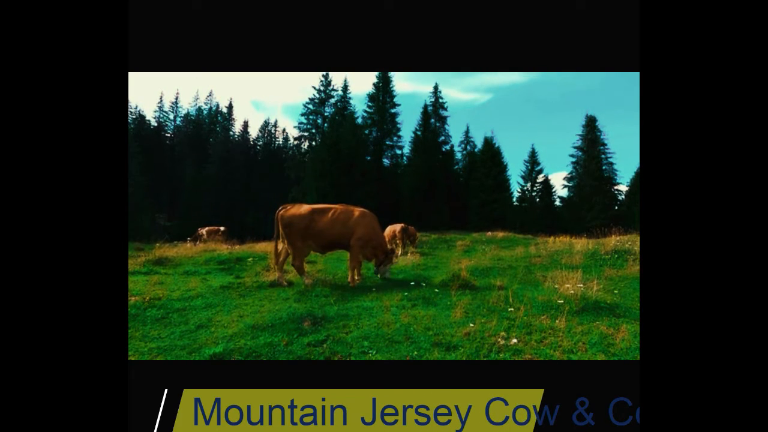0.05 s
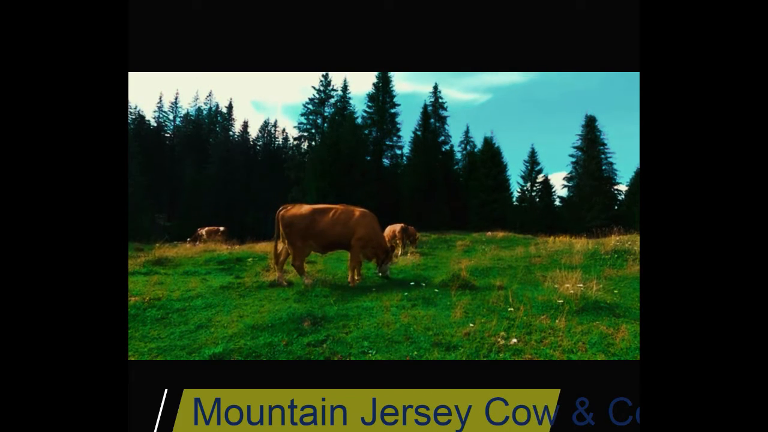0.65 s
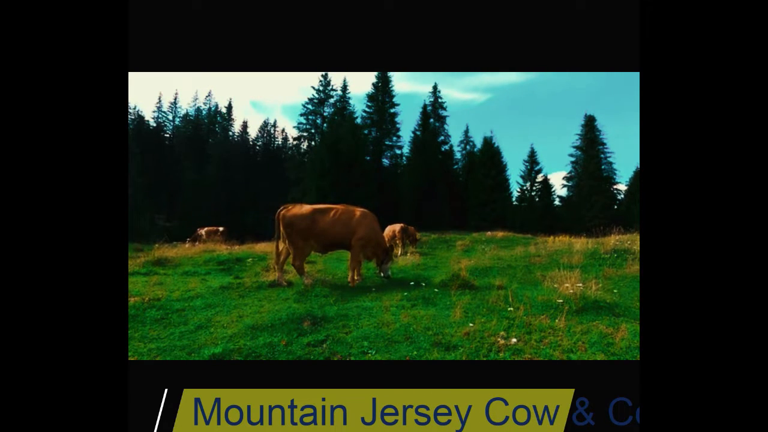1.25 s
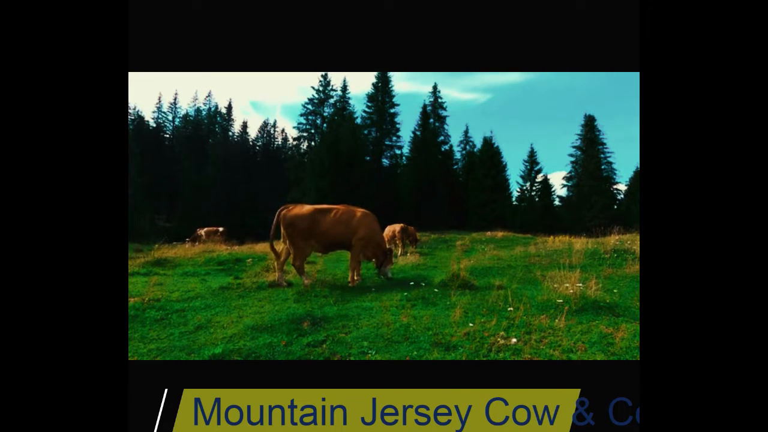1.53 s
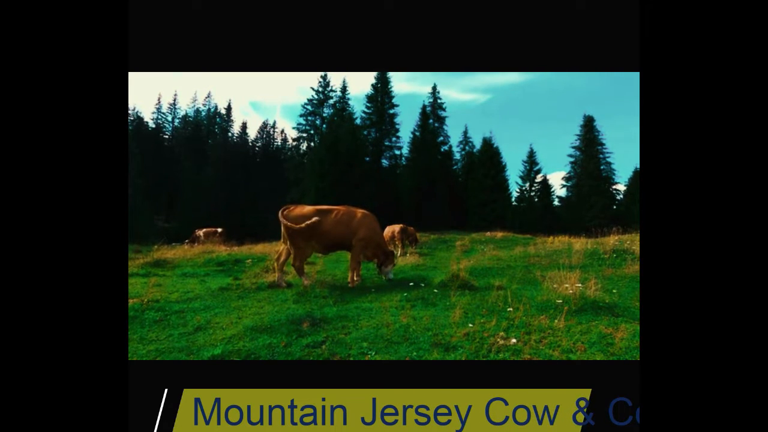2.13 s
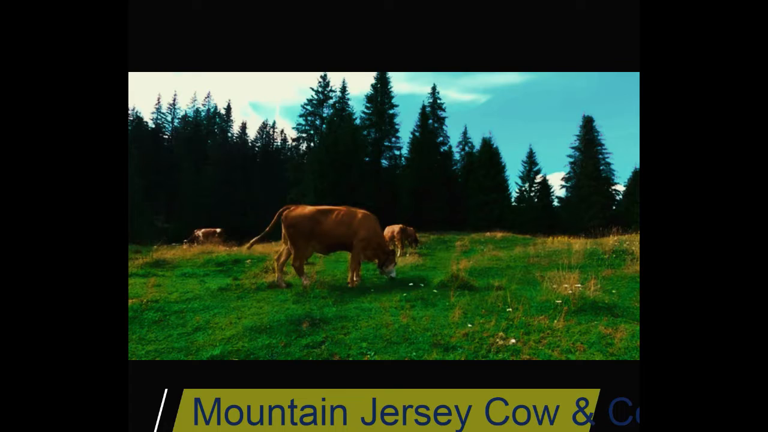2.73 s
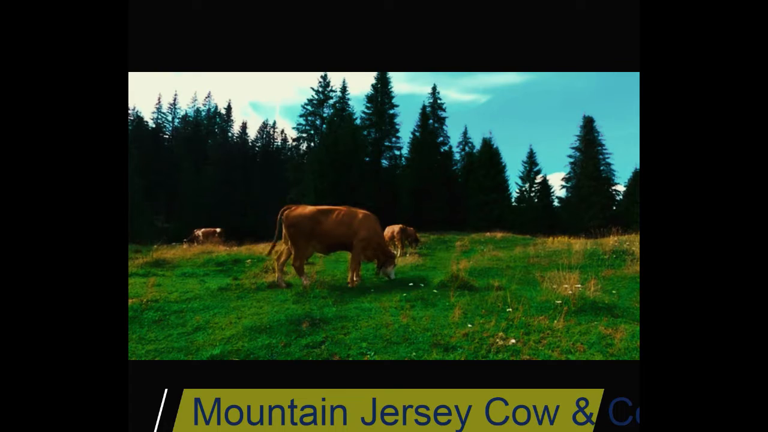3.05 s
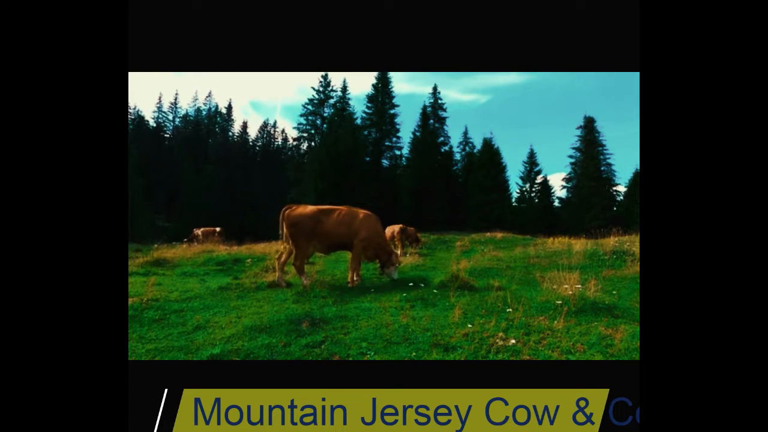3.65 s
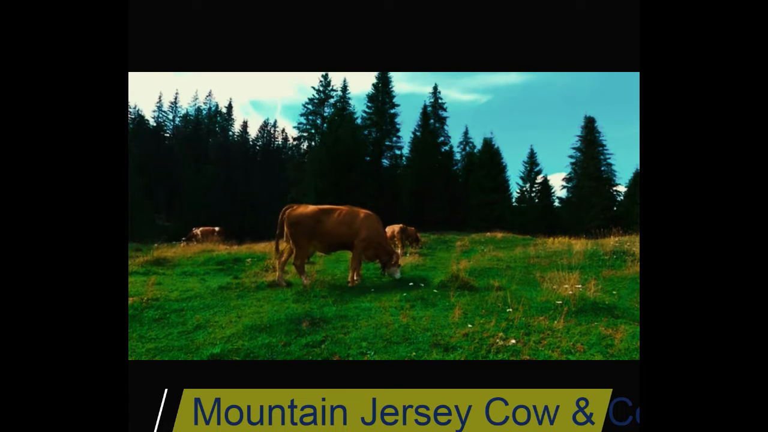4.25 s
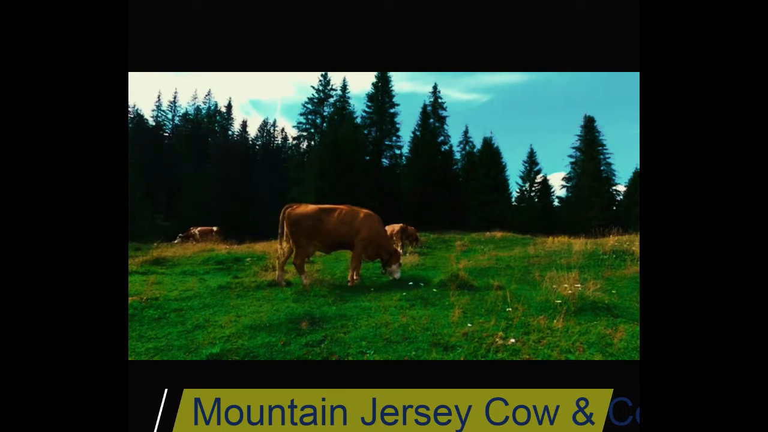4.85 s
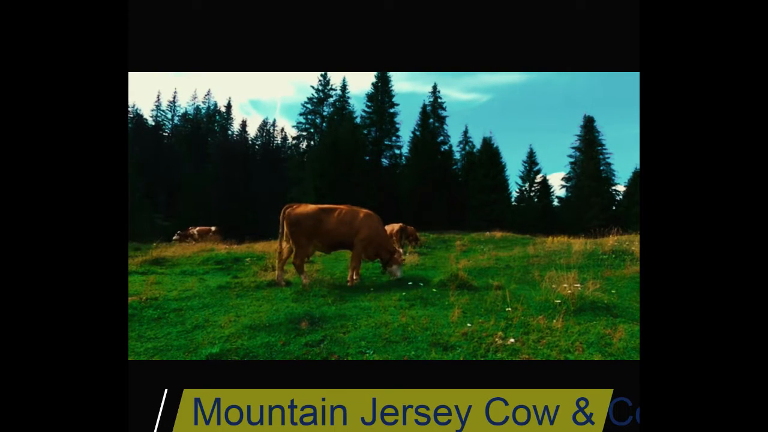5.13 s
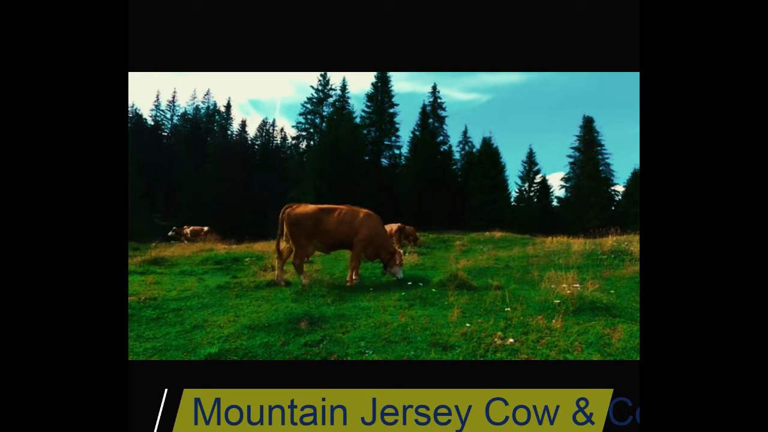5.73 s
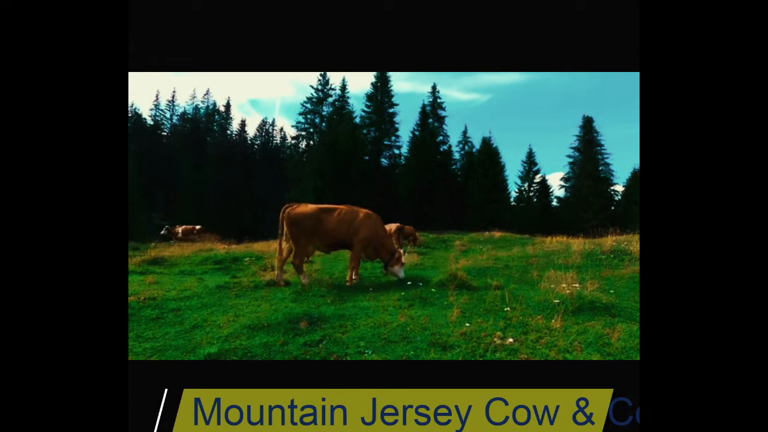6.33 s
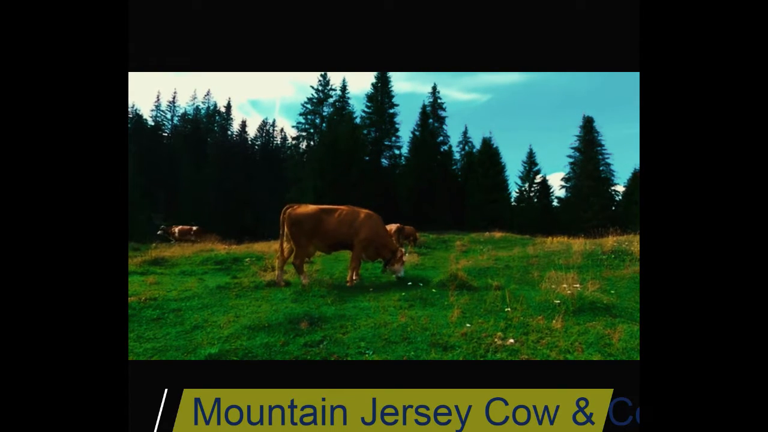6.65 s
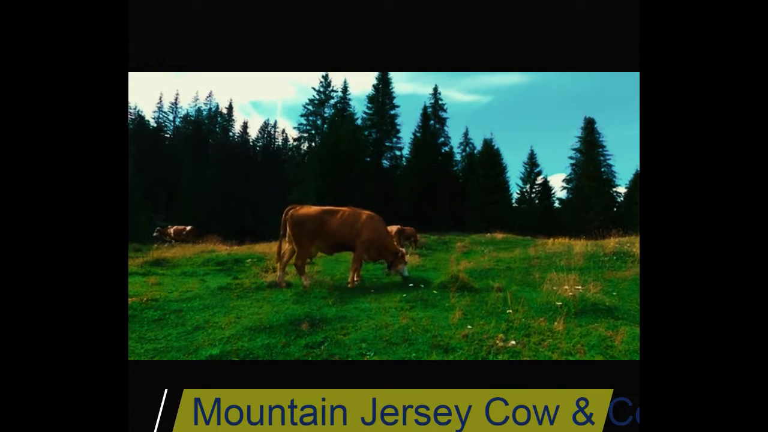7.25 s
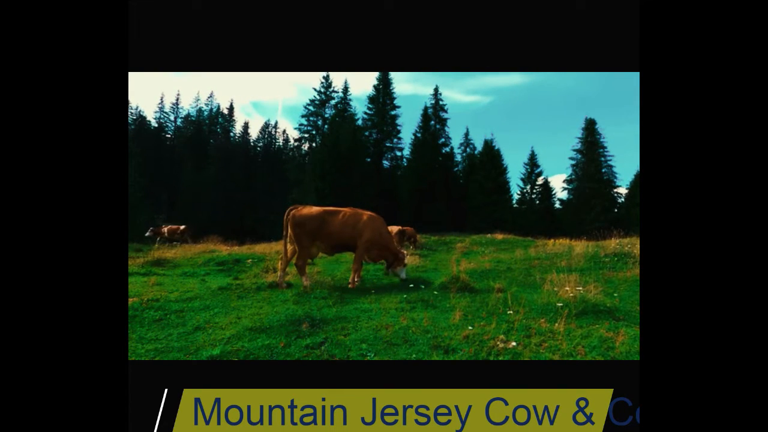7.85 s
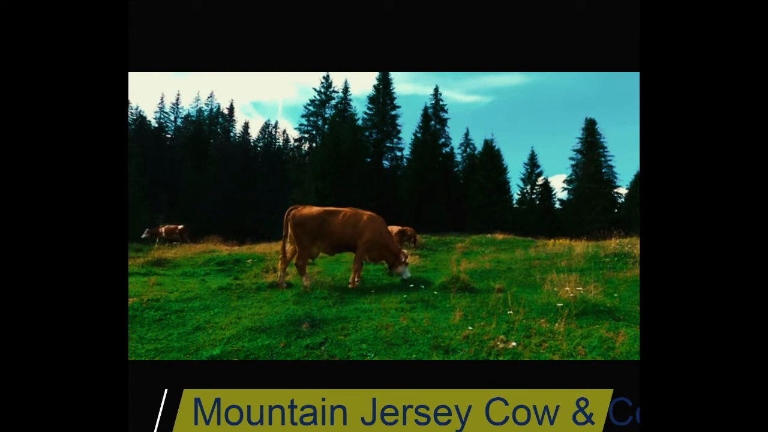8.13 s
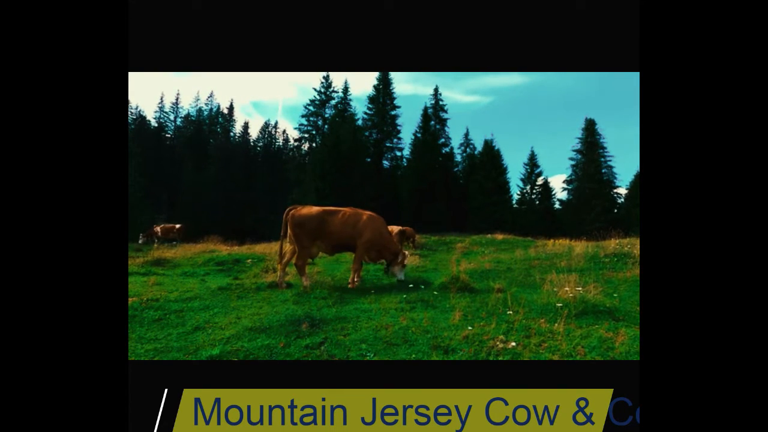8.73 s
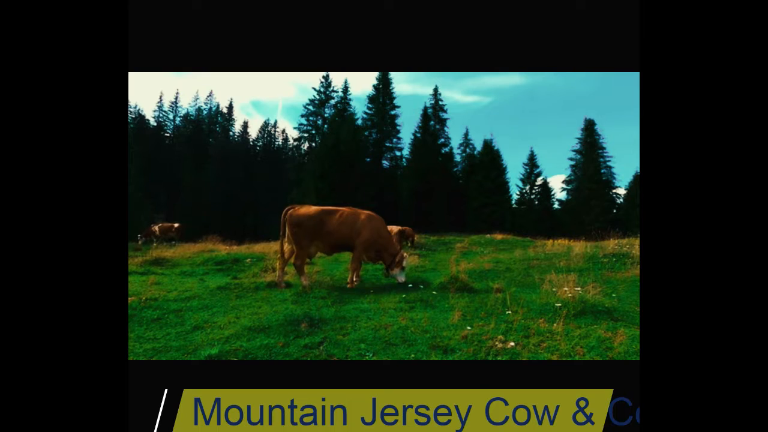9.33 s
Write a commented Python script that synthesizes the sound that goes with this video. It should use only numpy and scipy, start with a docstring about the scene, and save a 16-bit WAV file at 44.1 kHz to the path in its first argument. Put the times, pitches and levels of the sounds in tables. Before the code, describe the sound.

A cowbell clanks irregularly close by, with other bells tinkling further off and a low wind rumble at first.

```python
"""The sheet-metal bell of a cow grazing on a mountain meadow clanks with every tug at the grass.
Each impact of the clapper excites a hollow resonance of the air inside, a bright clang of upper wall
modes, and four long partials that swell and fade as the turning bell sweeps their lobes past.
Other bells tinkle further off, a spruce wood scatters a faint echo, and over the hush of still air
a breeze buffets the microphone in the first seconds."""
import sys
import numpy as np
from scipy import signal
from scipy.fft import rfft, irfft
from scipy.io import wavfile
from scipy.ndimage import map_coordinates

SR = 44100
rng = np.random.default_rng(int(sys.argv[2]) if len(sys.argv) > 2 else 0)


def write(x):
    x = np.atleast_2d(x).T
    wavfile.write(sys.argv[1], SR, np.round(np.clip(x, -1, 1) * 32767).astype(np.int16))


N = 414540
TIME = np.arange(N) / SR

# Clapper blows on the near bell; levels in all tables are relative:
# (time [s], clang level [dB], brightness [dB], knock level [dB], frequency the struck spot favours [Hz])
BLOWS = [(0.0, -34, -13.5, -30, 5130), (0.1756, -35.5, -16.5, -49, 8130), (0.361, -37, -14, -42, 3470),
         (0.4534, -24, -15, -23.5, 3800), (0.714, -32, -16, -46, 5130), (0.9035, -27.5, -14, -48, 4730),
         (0.915, -40, -4, -25.5, 4840), (0.9407, -28, -19.5, -22.5, 5330),
         (1.3531, -31, -18.5, -29.5, 4620), (1.5272, -29, -19, -30.5, 3900), (1.544, -24, -13.5, -26, 4520),
         (1.781, -30.5, -11, -28, 4700), (1.91, -31, -11, -30, 5970), (2.0589, -26.5, -14, -26.5, 7200),
         (2.2338, -29, -11.5, -45.5, 5800), (2.4042, -39, -10, -60, 3930), (2.4301, -22, -21.5, -28, 3900),
         (2.753, -35.5, -19, -45, 5200), (2.816, -24, -16, -46, 3350), (2.9434, -29.5, -8.5, -31.5, 3570),
         (2.961, -28, -25, -28.5, 6900), (3.2899, -33, -17, -58, 3900), (3.4466, -26, -13, -37.5, 5740),
         (3.4998, -31.5, -8, -38.5, 6270), (3.6086, -34, -21.5, -49.5, 3950),
         (3.6926, -28, -18, -28.5, 3950), (3.7389, -29.5, -16.5, -45, 4600), (3.8478, -25, -16, -23, 7420),
         (4.0352, -32, -19, -60, 4350), (4.3452, -25, -10.5, -24, 4740), (4.6374, -32, -14.5, -52, 6500),
         (4.749, -30, -22, -55, 4330), (4.7876, -26.5, -11.5, -34, 4970), (4.8338, -30, -20, -35, 6200),
         (5.004, -35, -15, -69, 4470), (5.037, -27, -18, -35, 4200), (5.1681, -26.5, -16, -22.5, 4220),
         (5.2159, -27.5, -20.5, -24.5, 6500), (5.3702, -32.5, -18, -52.5, 3830),
         (5.6711, -24, -16, -22.5, 4400), (5.7523, -29, -20, -31, 3540), (6.0777, -35.5, -20, -43, 5090),
         (6.2749, -25, -16.5, -20.5, 4640), (6.626, -45, -32, -77, 5800), (6.7283, -24.5, -17, -23.5, 4930),
         (6.7706, -28, -14.5, -33.5, 5040), (6.857, -36, -16, -58, 4220), (6.9849, -26.5, -22.5, -29, 5460),
         (7.0349, -32, -16, -34.5, 3850), (7.0968, -36.5, -16, -32.5, 4930),
         (7.19, -26.5, -11, -26.5, 3650), (7.2379, -29, -23, -25, 7230), (7.5146, -30, -29, -28, 3780),
         (7.6413, -37, -18.5, -81, 5660), (7.7798, -27.5, -13.5, -35.5, 6260),
         (7.811, -31, -30, -29.5, 6100), (7.8378, -31, -9, -37, 4630), (8.039, -26.5, -17.5, -26.5, 4220),
         (8.246, -38, -16.5, -34.5, 4260), (8.3508, -32.5, -18.5, -42.5, 5500),
         (8.5805, -32, -18, -29.5, 6420), (8.6218, -37, -13.5, -74, 3610), (8.771, -31.5, -19, -67, 5760),
         (8.872, -42.5, -18.5, -74, 6700), (9.0222, -24.5, -15.5, -23.5, 4950)]


def gain_of(db):
    """Decibels to amplitude."""
    return 10 ** (np.asarray(db) / 20)


def unit_rms(x):
    """Normalisation to rms 1."""
    return x / np.sqrt(np.mean(x ** 2) + 1e-20)


def curve_at(points, hz):
    """Linear interpolation of a spectrum on a log-frequency axis."""
    f, value = np.transpose(points)
    return np.interp(np.log(hz + 1), np.log(f + 1), value)


def add(mix, s, sound):
    """Superposition: a sound joins the mix at time s."""
    part = mix[..., max(0, round(s * SR)):][..., :sound.shape[-1]]
    part += sound[..., :part.shape[-1]]


def noise(spectrum):
    """Spectral shaping of white noise: two uncorrelated channels of rms 1."""
    shape = gain_of(curve_at(spectrum, np.fft.rfftfreq(N, 1 / SR)))
    return unit_rms(irfft(rfft(rng.standard_normal((2, N))) * shape, N))


def drift(hz):
    """Sines in random phase sum to a slow motion of rms 1, up to the given rate."""
    t = TIME[::100]
    path = sum(np.sin(2 * np.pi * (f * t + rng.random())) for f in hz * np.geomspace(1 / 4, 1, num=12))
    return np.interp(TIME, t, unit_rms(path))


def damped_modes(hz, t60, t):
    """Free decay of damped oscillators, one complex row a mode."""
    return np.exp(np.outer(2j * np.pi * hz - np.log(1000) / t60, t))


def knock(blows, hz, t60, rise_s, db, spread):
    """One damped mode, detuned a little from blow to blow as the bell's mouth nears neck and grass."""
    t, out = TIME[:SR // 2], np.zeros(N)
    envelope = (1 - np.exp(-t / rise_s)) ** 2 * gain_of(db - 60 * t / t60)
    for (s, level_db), shift in zip(blows, rng.standard_normal(len(blows))):
        add(out, s, gain_of(level_db) * envelope * np.sin(2 * np.pi * hz * (1 + spread * shift) * t))
    return out


def struck_bell(blows, modes, db, scatter_db, rise_s=0.00036):
    """Modal superposition: every blow excites the same modes in a new mixture."""
    hz, mode_db, t60 = np.transpose(modes)
    t, out = TIME[:SR], np.zeros(N)
    rings = damped_modes(hz, t60, t).imag * (1 - np.exp(-t / rise_s))
    for (s, level_db), (size, sign) in zip(blows, rng.standard_normal((len(blows), 2, len(hz)))):
        add(out, s, (np.sign(sign) * gain_of(db + level_db + mode_db + scatter_db * size)) @ rings)
    return out


def still_air(db=-51.5):
    """Stationary noise: the hush over the meadow."""
    # Spectrum of the hush: (frequency [Hz], spectral density [dB])
    spectrum = [(15, -7), (40, -1), (100, -3.5), (180, -5), (280, -16), (450, -13.5), (1000, -20),
                (2300, -15), (4000, -15), (6000, -20), (10000, -38), (15000, -47)]
    return gain_of(db) * noise(spectrum)


def wind(breeze_db=-43, drop_db_per_s=7.5, mild_db=-42, strong_db=-36, rumble_growth=0.66, steepening=1.87):
    """Turbulent pressure buffets mostly the right port; flutter grows faster with a gust than rumble."""
    # Gusts on the dying breeze: (peak time [s], level [dB], half-width [s])
    gusts = [(0.108, -39, 0.097), (0.245, -37.5, 0.089), (0.608, -35, 0.072), (0.787, -35.5, 0.033),
             (1.095, -39, 0.22), (1.298, -35, 0.017), (1.71, -41.5, 0.059), (2.026, -39.5, 0.057),
             (2.185, -39.5, 0.071), (2.383, -45.5, 0.086), (3.113, -46.5, 0.04), (3.345, -54, 0.023)]
    # Deep rumble: (frequency [Hz], spectral density [dB])
    rumble_spectrum = [(10, -15.5), (35, 1.5), (65, -2.5), (100, -9), (200, -48), (500, -85)]
    # Higher flutter: (frequency [Hz], spectral density [dB])
    flutter_spectrum = [(40, -46), (90, -4.5), (130, 2.5), (195, -7), (260, -19.5), (400, -36), (900, -77),
                        (3000, -100)]
    power = gain_of(breeze_db - drop_db_per_s * TIME) ** 2
    for s, gust_db, half_s in gusts:
        power += gain_of(gust_db) ** 2 * np.exp(-((TIME - s) / half_s) ** 2)
    level_db = 10 * np.log10(power) + 2 * drift(hz=24)
    rumble = noise(rumble_spectrum) * gain_of([[-1], [9.5]])  # left, right
    flutter = noise(flutter_spectrum) * gain_of([[-19], [11.5]])
    rumble_db = mild_db + rumble_growth * (level_db - mild_db)
    flutter_db = level_db + steepening * np.minimum(level_db - strong_db, 0)
    return rumble * gain_of(rumble_db) + flutter * gain_of(flutter_db)


def forest_echo(x, db=-26, t60=0.75, treble_t60=1.0, build_s=0.15):
    """Scattering at the edge of the spruce wood returns a faint, diffuse tail."""
    hz, t, spectra = signal.stft(rng.standard_normal((2, SR)), SR, nperseg=256)
    band_t60 = curve_at([(1000, t60), (10000, treble_t60)], hz)[:, None]
    envelope = gain_of(-60 * t / band_t60) * (1 - np.exp(-t / build_s))
    tail = signal.istft(spectra * envelope, SR, nperseg=256)[1]
    return gain_of(db) * signal.fftconvolve(x[None], tail / np.linalg.norm(tail[0]), axes=1)[:, :N]


def herd(db=-55, blows_per_s=3, scatter_db=4, count=60):
    """Attenuation over distance dulls the herd's bells: each is one low mode, struck at random."""
    # One mode a bell: (frequency [Hz], level [dB], t60 [s])
    modes = [(567, -1.5, 0.58), (621, 6, 0.53), (674, 8, 0.7)]
    t, out = TIME[:SR], np.zeros(N)
    for hz, mode_db, t60 in modes:
        ring = damped_modes(hz, t60, t)[0].imag * (1 - np.exp(-t / 0.00025))
        for s, size in zip(rng.uniform(0, count / blows_per_s, count), rng.standard_normal(count)):
            add(out, s, gain_of(db + mode_db + scatter_db * min(size, 1.5)) * ring)
    return out


def neighbour_bell():
    """Impacts set a neighbour's faint bell into free vibration in five modes."""
    # Clapper blows: (time [s], level [dB])
    blows = [(0.329, -54), (1.107, -51), (4.112, -56), (4.94, -53), (5.975, -60), (6.701, -53.5),
             (7.335, -54.5), (8.987, -54.5)]
    # Modes of the bell: (frequency [Hz], level [dB], t60 [s])
    modes = [(639, -4.5, 0.31), (1680, -1, 0.24), (3130, 3, 0.76), (3290, 5, 0.42), (5130, -4.5, 0.25)]
    return struck_bell(blows, modes, db=10.5, scatter_db=1.5)


def small_bell():
    """A second cow's bell: heavy damping gives a dull clonk, light damping a thin ring and a rim tone."""
    # Clapper blows: (time [s], clonk level [dB], ring level [dB])
    blows = [(0.516, -44, -49), (0.739, -49, -49), (0.906, -40, -43), (1.545, -44, -45.5),
             (2.061, -48, -48), (2.233, -42, -39), (2.815, -43, -35), (3.285, -53, -47),
             (3.608, -59, -38.5), (4.639, -50, -41.5), (4.848, -46, -58), (5.035, -46, -42),
             (5.303, -47, -54), (7.038, -56, -46), (7.642, -54, -41.5), (8.408, -47, -54),
             (8.625, -45, -52.5), (8.774, -49, -49.5)]
    # Partials of the ring: (frequency [Hz], level [dB], t60 [s])
    modes = [(1318, -14.5, 0.81), (2600, 5.5, 1), (2793, -1, 1), (3680, -3, 0.14)]
    # Light taps on the rim: (time [s], level [dB])
    rim_taps = [(7.036, -34), (9.376, -49)]
    clonk = knock([(s, db) for s, db, _ in blows], hz=1778, t60=0.13, rise_s=0.005, db=25.5, spread=0.0045)
    ring = struck_bell([(s, db) for s, _, db in blows], modes, db=3, scatter_db=2)
    rim = knock(rim_taps, hz=3920, t60=0.55, rise_s=0.001, db=0, spread=0.0005)
    return clonk + ring + rim


def ports(x):
    """Level and phase differences place the bells a little right: that port mostly leads and is louder."""
    # Level difference: (frequency [Hz], left minus right [dB])
    balance = [(750, -2), (1400, -2), (2000, 0.5), (3800, -0.5), (5000, -1.5), (8000, -7.5), (9600, -0.5)]
    # Phase difference: (frequency [Hz], lead of the left port [rad])
    lead = [(735, 0.22), (1930, -0.41), (2850, -0.74), (5200, -0.89), (7600, -0.22), (15000, 1)]
    hz = np.fft.rfftfreq(N, 1 / SR)
    half = gain_of(curve_at(balance, hz) / 2) * np.exp(0.5j * curve_at(lead, hz))
    return irfft(rfft(x) * np.array([half, 1 / half]), N)


def high_pass(x, cutoff_hz=1150):
    """Fourth-order high-pass: the wall's sounds carry no bass below the cut-off."""
    return signal.sosfilt(signal.butter(4, cutoff_hz, "high", fs=SR, output="sos"), x)


def swaying(x, sway_s=0.00012, sway_hz=3.5, echo_s=0.003, echo_sway_s=0.000302, echo_db=-7):
    """Doppler shift bends the pitch; a shifting echo off the ground makes the clang's overtones flicker."""
    direct_time = TIME - sway_s * drift(sway_hz)
    echo_time = direct_time - echo_s - echo_sway_s * drift(sway_hz * 2)
    direct = np.array([map_coordinates(side, [direct_time * SR], order=3) for side in x])
    ground_echo = np.array([map_coordinates(side, [echo_time * SR], order=3) for side in x])
    return (direct + gain_of(echo_db) * ground_echo) / np.hypot(1, gain_of(echo_db))


def hollow_knock():
    """Cavity resonance: each blow briefly sounds the air inside the near bell."""
    blows = [(s, knock_db) for s, _, _, knock_db, _ in BLOWS]
    return knock(blows, hz=734.5, t60=0.18, rise_s=0.0029, db=10.5, spread=0.0054)


def long_ring(null_db=-19, onset_s=0.0002, bloom_db=-5, bloom_s=0.023):
    """Directivity: low partials radiate in lobes, so each swells and fades as the bell turns."""
    # Long partials of the wall:
    # (frequency [Hz], t60 [s], lobe pairs [count], lobe phase [deg], level over a blow's clang [dB])
    partials = [(1417.7, 0.91, 1, 3.7, -26.5), (1932, 1.69, 2, 1.4, -42), (2736, 0.84, 4, 144.7, -13),
                (2931, 1.36, 3, 11.4, -22)]
    # Tugs at the grass, each turning the bell and ringing it anew: (time [s], starting angle [deg],
    # first speed [deg/s], last speed [deg/s], level of each of the four partials from low to high [dB])
    tugs = [(0.0, 117.2, 111, -33, -35, -27.5, -6.5, -23),
            (0.174, 23.6, 43, -101, -52, -43.5, -24.5, -32.0),
            (0.363, 95.2, -215, -46, -44, -29.5, -30, -17.5), (0.454, 82, -87, -130, -24, -16, -9, -20.5),
            (0.717, 125.5, 95, -359, -43.5, -20.0, -22.5, -24.0),
            (0.938, 21.7, 80, -10, -44, -13.5, -13.5, -10.5), (1.353, 132.2, 7, -177, -38.5, -25, -30, -39),
            (1.531, 147, -28, -117, -32, -11.5, -20.5, -10),
            (1.783, 110.3, -99, -8, -32.5, -35, -21, -26.5),
            (2.057, 75.5, -143, -246, -43, -18.5, -14, -32), (2.2373, 135.6, -74, -255, -60, -17, -24, -40),
            (2.431, 119.1, -8, 128, -25.5, -16, -7.5, -14.5), (2.817, 41, 192, 118, -62, -20, -43, -27.5),
            (2.947, 122, 45, 27, -35, -14.5, -15, -16.5), (3.449, 72, -194, -174, -27.5, -30, -28.5, -22.5),
            (3.693, 137.8, 51, 265, -66, -21, -26.5, -19), (3.8493, 100, 152, -172, -34, -18.5, -15.0, -41),
            (4.3442, 86.4, 179, -58, -24.5, -21.5, -12.5, -33),
            (4.788, 70.5, 141, -163, -30, -33.5, -25.0, -34),
            (5.037, 37.8, 112, -618, -50, -26.5, -22, -31), (5.215, 109.5, 70, 17, -28.5, -28, -9.5, -29.5),
            (5.6717, 100.6, 108, 49, -33.0, -18, -18, -23.5),
            (6.276, 28, -210, 106, -56, -21.0, -19.5, -42),
            (6.729, 135.2, 241, -117, -28, -19, -23.5, -13.5),
            (6.985, 69.8, 187, 265, -25, -38.5, -21, -34),
            (7.193, 166.7, 307, -98, -32.5, -24.5, -20.5, -31),
            (7.5142, 70.9, 106, 229, -31, -42, -20.0, -49.5),
            (7.781, 149.2, -82, 41, -35.5, -30.5, -28.5, -10),
            (8.039, 139.6, 322, 55, -38, -30, -26, -38.5),
            (8.5795, 57, -122, 94, -37.5, -25.5, -35.5, -46.5),
            (9.02, 25, -188, 662, -37.5, -19, -18.5, -28)]
    start, angle, first_speed, last_speed, *levels = np.transpose(tugs)
    tug = np.maximum(np.searchsorted(start, TIME, "right") - 1, 0)
    since = TIME - start[tug]
    acceleration = (last_speed - first_speed) / np.diff(start, append=N / SR)
    facing = np.radians(angle[tug] + first_speed[tug] * since + acceleration[tug] * since ** 2 / 2)
    bloom = bloom_db * np.exp(-since / bloom_s)  # the ring takes a moment to reach full strength
    s, clang_db = np.transpose(BLOWS)[:2]
    blow_energy, out = np.zeros(N), np.zeros(N)
    blow_energy[(s * SR).astype(int)] = gain_of(clang_db) ** 2
    ease = np.exp(-1 / (onset_s * SR))
    for (hz, t60, lobes, lobe_phase, stir_db), level_db in zip(partials, levels):
        stored = signal.lfilter([1], [1, -gain_of(-60 / SR / t60) ** 2], blow_energy)
        tugged = gain_of(level_db[tug] + bloom - 60 * since / t60)
        amplitude = np.sqrt(tugged ** 2 + gain_of(stir_db) ** 2 * stored)
        # Neighbouring lobes are opposite in sign, with a shallow null between them.
        beam = np.cos(lobes * facing + np.radians(lobe_phase)) + 1j * gain_of(null_db)
        phase = np.exp(2j * np.pi * rng.random(len(start)))[tug]
        envelope = signal.lfilter([(1 - ease) ** 2], np.poly([ease, ease]), amplitude * beam * phase)
        out += (envelope * np.exp(2j * np.pi * hz * TIME)).real
    return out


def wall_modes(t, t60=0.36, damping_slope=0.056, split_hz=8, linger_db=-21, weak_count=90):
    """Beating: upper wall modes come in slightly split pairs. Returns frequencies, levels and rings."""
    # Strong upper modes: (frequency [Hz], level [dB])
    strong_modes = [(3651, 1.5), (3714, -15), (3753, 1.5), (4096, -4), (4195, 1), (4667, -2.5),
                    (4752, -3.5), (4792, -5), (4894, 1.5), (5092, -3), (5237, -4.5), (5297, -11),
                    (5744, -3), (5781, -5.5), (5980, -4), (6093, -5.5), (6190, 3), (6272, -12.5),
                    (6481, -9), (7100, -2.5), (7256, -4), (7547, -15), (7725, -1.5), (8198, -15),
                    (8586, -11), (9609, -13)]
    # Envelope of the many weak modes: (frequency [Hz], level of each [dB])
    weak_modes = [(3500, -38), (5100, -30), (5500, -22), (6100, -15), (8500, -12.5), (10500, -19),
                  (13500, -25), (15600, -42)]
    strong_hz, strong_db = np.transpose(strong_modes)
    weak_hz = np.linspace(weak_modes[0][0], weak_modes[-1][0], weak_count)
    weak_hz += rng.uniform(-72, 64.4, weak_count)
    hz = np.tile(np.r_[strong_hz, weak_hz], 2)
    hz += split_hz * rng.standard_normal(len(hz))
    mode_db = np.tile(np.r_[strong_db, curve_at(weak_modes, weak_hz)], 2)
    mode_t60 = t60 * (5000 / hz) ** damping_slope
    linger = 1 + gain_of(linger_db + np.outer(40 / mode_t60, t))  # a faint part rings three times as long
    return hz, mode_db, damped_modes(hz, mode_t60, t) * linger


def wall_responses(t, press, port_scatter, scatter_db=4.5, spot_db=8, spot_width_hz=230):
    """The point of impact weights the modes: each blow lands elsewhere and has its own stereo sound."""
    hz, mode_db, rings = wall_modes(t)
    rings = (press * rings).astype(np.complex64)
    _, _, bright_db, _, spot_hz = np.transpose(BLOWS)
    chance = rng.standard_normal((len(BLOWS), 5, len(hz)))
    height = np.clip(np.log2(hz / 5600) * 2, 0, 1)  # harder contact favours the top octave
    luck = np.minimum(np.tile(chance[:, 0, :len(hz) // 2], 2), 1.5)  # alike for both modes of a pair
    hardness_db = np.outer(0.99 * (bright_db + 9.5), height)
    favour_db = spot_db * np.exp(-((hz - spot_hz[:, None]) / spot_width_hz) ** 2)
    size = gain_of(mode_db + scatter_db * (1.5 + height / 2) * luck + hardness_db + favour_db)
    size *= np.sqrt(2 / (size ** 2 * (1 - height)).sum(1, keepdims=True))  # equal power below the top
    mixture = size * np.exp(1j * np.angle(chance[:, 1] + 1j * chance[:, 2]))
    side = port_scatter * (chance[:, 3] + 1j * chance[:, 4]) / np.sqrt(2)
    left_right = mixture * (1 + side), mixture * (1 - side)
    return np.stack([(weights.astype(np.complex64) @ rings).real for weights in left_right], 1)


def crack(t, press, port_scatter, db, crack_db=-9, t60=0.08, tick_db=8, tick_s=0.001, hard_db=-25):
    """Impact noise of iron on iron: a sharp tick and a short broadband decay."""
    # Spectrum of the impact: (frequency [Hz], spectral density [dB])
    spectrum = [(250, -31), (600, -19), (1100, 7), (1900, 10), (3800, 18.5), (6000, -9), (9000, -3),
                (16000, -33)]
    contact = press * (gain_of(crack_db - 60 * t / t60) + gain_of(tick_db) * np.exp(-t / tick_s))
    envelope = np.zeros(N)
    for s, level_db, *_ in BLOWS:
        softness_db = min(level_db - hard_db, 0)  # a light tap hardly cracks
        add(envelope, s, gain_of(level_db + db + softness_db) * contact)
    middle, side = noise(spectrum)
    return envelope * (middle + port_scatter * np.array([side, -side]))


def brushing(responses, t, per_s=9, softest_db=-50, range_db=10, muted_s=0.05, count=200):
    """Random excitation: the loose clapper brushes the wall in light touches, soon muted."""
    out, mute = np.zeros((2, N)), np.exp(-t / muted_s)
    for when, force, which in rng.random((count, 3)):
        touch = responses[int(which * len(responses))] * mute
        add(out, when * count / per_s, gain_of(softest_db + range_db * force) * touch)
    return out


def rattle(responses, t, contacts=26, range_db=12, muted_s=0.028):
    """Contact chatter: the clapper skitters in quick, muted taps too light to excite the lower modes."""
    # Rattles after hard throws: (time [s], level [dB], length [s])
    rattles = [(0.486, -36, 0.076), (0.983, -36.5, 0.091), (2.453, -36, 0.2), (2.564, -39.5, 0.059),
               (2.97, -36.5, 0.077), (4.358, -39.5, 0.11), (4.416, -43, 0.063), (5.224, -34, 0.11),
               (5.68, -34, 0.077), (6.293, -40, 0.068), (6.769, -35, 0.092), (7.53, -41, 0.075)]
    out, mute = np.zeros((2, N)), np.exp(-t / muted_s)
    for s, level_db, length_s in rattles:
        for when, force, which in rng.random((contacts, 3)):
            tap = responses[int(which * len(responses))] * mute
            add(out, s + when * length_s, gain_of(level_db - range_db * force) * tap)
    return high_pass(out, cutoff_hz=4200)


def clang(db=1, contact_s=0.0003, port_scatter=0.38):
    """Impulse excitation: the clapper strikes, brushes and rattles the upper modes of the near bell."""
    t, out = TIME[:SR * 3 // 4], np.zeros((2, N))
    press = np.sin(np.pi / 2 * np.minimum(t / contact_s, 1)) ** 2  # the clapper takes a moment to press home
    responses = wall_responses(t, press, port_scatter)
    for (s, level_db, *_), response in zip(BLOWS, responses):
        # After a soft tap the clapper lingers and damps the wall.
        damping_db = -8 * max(-20.5 - level_db, 0) * np.minimum(t, 0.15)
        add(out, s, gain_of(level_db + db + damping_db) * response)
    return out + crack(t, press, port_scatter, db) + brushing(responses, t) + rattle(responses, t)


def scene():
    """Superposition of the near bell, other bells, their echo, wind and still air."""
    hollow = hollow_knock()
    neighbour = neighbour_bell()
    wall = high_pass(swaying(clang()) + long_ring())
    bells = wall + hollow + small_bell() + neighbour + herd()
    return ports(bells) + forest_echo(bells.mean(0)) + wind() + still_air()


def record(dry, edge_hz=15500):
    """Band limiting by a steep linear-phase low-pass."""
    low_pass = signal.firwin(511, edge_hz, window=("kaiser", 9), fs=SR)
    return signal.oaconvolve(dry, low_pass[None], "same")


dry = scene()
out = record(dry)
write(out)
```